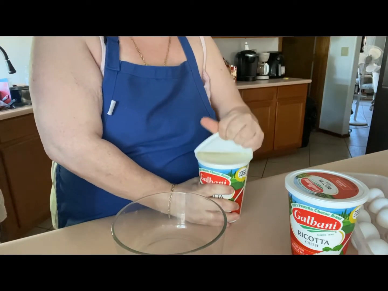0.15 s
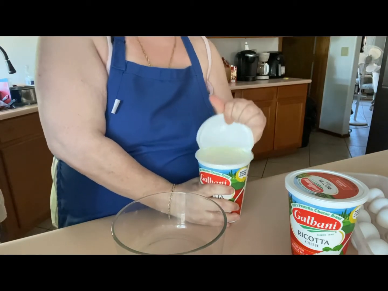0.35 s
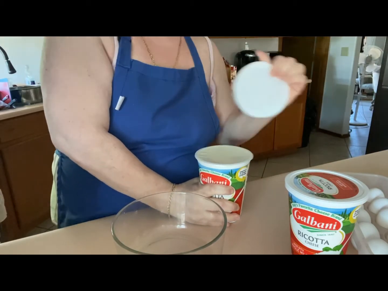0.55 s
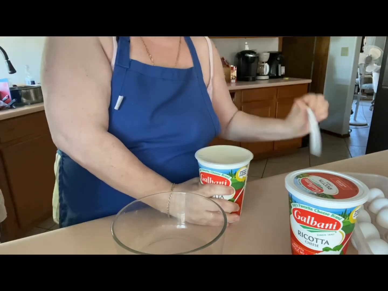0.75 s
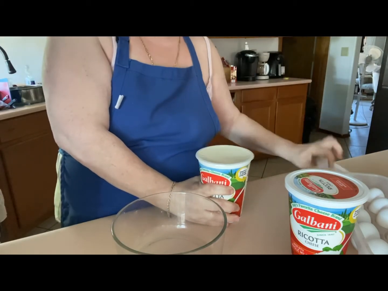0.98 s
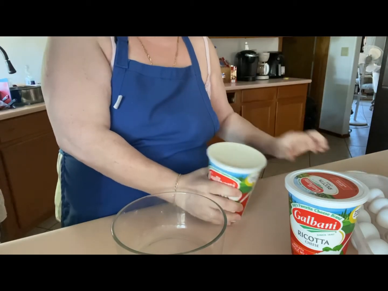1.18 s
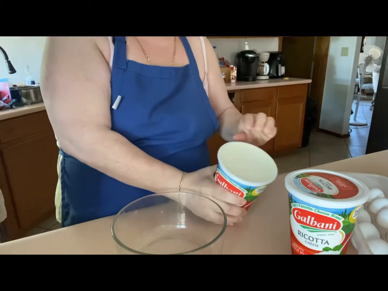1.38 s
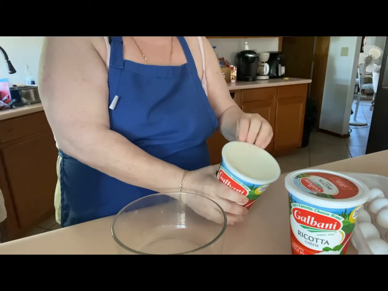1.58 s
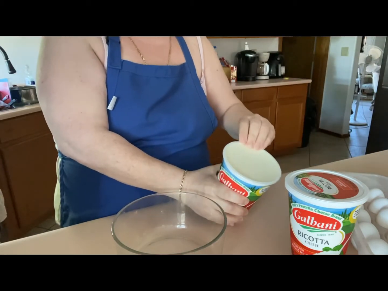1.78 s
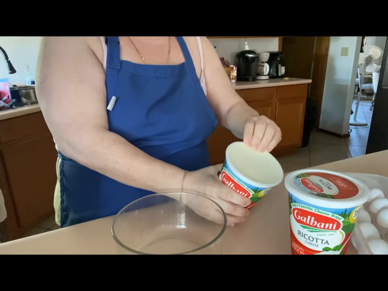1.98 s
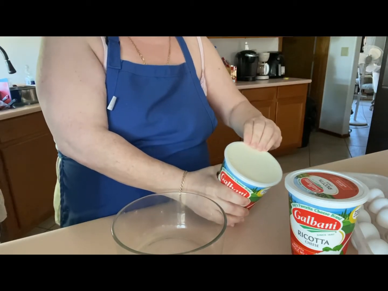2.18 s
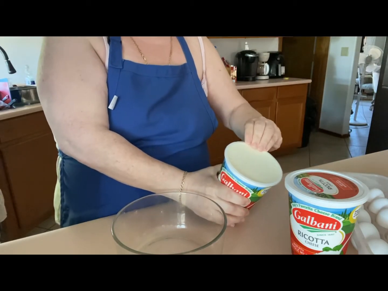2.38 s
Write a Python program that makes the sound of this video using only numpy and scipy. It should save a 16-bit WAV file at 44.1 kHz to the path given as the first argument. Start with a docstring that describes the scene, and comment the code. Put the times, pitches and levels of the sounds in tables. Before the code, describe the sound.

A plastic lid snaps off a tub, then clatters onto a kitchen counter.

```python
"""Kitchen counter: a hand pries the lid off a plastic tub. The stressed rim creaks and lets go in
sharp snaps, the tub pops, the counter thuds. The tossed lid slaps down, bounces with a clack and
wobbles to rest; fingers brush the foil seal. Hard walls ring after each hit, over appliance rumble
and a thin whine."""
import sys
import numpy as np
from scipy import signal
from scipy.fft import rfft, irfft
from scipy.io import wavfile
from scipy.ndimage import uniform_filter1d

SR = 44100
rng = np.random.default_rng(int(sys.argv[2]) if len(sys.argv) > 2 else 0)


def bounce(signal):
    """Save signal as a 16-bit WAV file at the path given by the first command-line argument."""
    frames = np.transpose(np.atleast_2d(signal))
    limited = np.clip(frames, -1, 1)
    pcm = np.round(limited * 32767).astype(np.int16)
    wavfile.write(sys.argv[1], SR, pcm)


N = 108045
T = np.arange(N) / SR

# appliance noise spectrum: f/Hz, relative density/dB
HUM_SPECTRUM = [(25, -17.5), (50, -2), (90, -9.5), (120, -2), (170, -11.5), (210, -5), (300, -2),
                (394, -10.5), (531, -10.5), (800, -22), (1370, -34.5), (3000, -41.5), (6200, -45.5),
                (11200, -48), (12500, -62), (16000, -64.5)]
# its stereo width: f/Hz, side minus mid/dB
HUM_WIDTH = [(60, -22), (110, -16), (200, -12), (380, -4), (700, 1), (1290, 1.5), (2380, 0.5), (4400, 1.5),
             (8120, -9.5), (15000, 8.5)]
# its balance: f/Hz, left minus right/dB
HUM_BALANCE = [(60, 3), (110, 0), (200, 2.5), (380, 5.5), (700, 3), (1290, 0.5), (2380, 2.5), (4400, 3),
               (8120, 0.0), (15000, 1)]
# swell of its bass: t/s, gain/dB
BASS_SWELL = [(0, -1.5), (.7, 0.5), (1.3, -0.5), (1.7, -3), (1.95, 1.5), (2.45, -0.5)]
# appliance whine: f/Hz, rms level/dB
WHINE_TONES = [(3031, -87.5)]
# kitchen reverberation: f/Hz, t60/s, relative level/dB
ROOM_BANDS = [(125, 0.47, -4), (252, .55, 2.5), (514, .65, 5.5), (930, .65, 1.5), (2160, .65, 4.5),
              (3209, 0.33, 0), (5500, 0.26, -7.5), (8100, 0.34, -3), (10297, 0.23, -4)]
# microphone port balance: f/Hz, left minus right/dB
PORT_BALANCE = [(60, 1.5), (110, 0), (200, 5), (380, 2.5), (700, 4), (1290, 2.0), (2380, 3.5), (4400, 1.5),
                (8120, -0.5), (15000, -1.5)]
# microphone port phase: f/Hz, left lead/rad
PORT_PHASE = [(100, 0), (500, -.5), (1000, -.25), (2000, -.5), (4000, -.4), (8000, -1.3), (12000, -2.55),
              (16000, -2.6)]
# fingers on the seal: t/s, length/s, level/dB
BRUSHES = [(0.628, .04, -84), (0.733, 0.06, -83.5), (1.426, .045, -72), (1.447, 0.098, -70.5),
           (1.93, 0.069, -78.5), (2.069, 0.052, -99)]
# counter top modes: f/Hz, relative level/dB, t60/s
COUNTER_MODES = [(52.67, -7.5, 0.44), (65, -5, 0.34), (98, -6.5, 0.32), (119, -2, 0.28), (135, -10, .3),
                 (142, -7.5, 0.084), (182.5, -12, 0.25), (222, -10.5, .1), (281, -10.5, 0.072),
                 (331, -16.5, 0.24)]
# pushes on the counter: t/s, peak/dB
THUDS = [(.0, -44.5), (.12, -43), (.254, -15.5), (0.299, -35.5), (.44, -48.5), (.81, -48), (0.899, -44.5),
         (1.085, -52)]
# short hollow plastic knocks (tub pops, then the bouncing lid's clack): t/s, peak/dB, f/Hz
KNOCKS = [(.125, -40, 1640), (.2413, -22, 1400), (.2503, -10.5, 1600), (.2525, -16, 3930),
          (0.3005, -12.5, 1513), (.3, -19, 678), (.33, -26, 316), (0.9744, -19.5, 1390),
          (.9755, -35.5, 2000)]
# free lid modes: f/Hz, relative level/dB, t60/s
LID_MODES = [(900, -18, .006), (1204, -2, .008), (1650, -5, 0.019), (1940, -6.5, 0.022), (2065, -8, 0.034),
             (2450, -3, 0.0058), (3197, -6.5, .014), (4150, -4.5, 0.0069), (5072, -3.5, 0.0028),
             (5770, -4, 0.0027), (6610, -6, 0.0037), (7500, -7, .0025), (8800, -10.5, .002),
             (12200, -12.5, .0015)]
# modes of the lid landing flat: f/Hz, relative level/dB, t60/s
SLAP_MODES = [(162, -14, 0.085), (361.1, -6.5, 0.071), (620, -12, 0.027), (888, -2.5, 0.013),
              (1142, -1.5, 0.0086), (1490, -3.5, .008), (1950, -6.5, 0.0057), (2500, -11, 0.0037),
              (3310, -27.5, 0.0022)]
# flat landing: t/s, peak/dB
SLAP = (.8097, -9)
# lid edge ticking the counter: t/s, peak/dB, nominal length/ms, tilt/(dB/octave)
BOUNCES = [(0.907, -17.5, 1.6, 3), (0.969, -33, 1.5, 3.5), (0.9741, -21.5, 0.57, -0.5),
           (1.008, -37.5, 1.4, 11.5), (1.114, -29, 0.34, -1), (1.122, -32, 0.5, 2.5), (1.147, -48, 1.2, 4),
           (1.157, -35, 0.65, -2), (1.186, -60, 1.2, -9)]
# lid rolling on its edge: t/s, level/dB
WOBBLE_ENVELOPE = [(.90, -72), (.915, -40.5), (1.0, -41), (1.1, -57), (1.13, -49.5), (1.19, -51.5),
                   (1.24, -54.5), (1.3, -85.5)]
# rim resonances: f/Hz, width/Hz, relative level/dB
RIM_MODES = [(308.4, 200, -7), (680.1, 250, -3), (1035, 400, -3.5), (1656, 730, 1.5), (2592, 510, -2),
             (3755, 1400, -2), (6235, 1500, -1), (7980, 2200, -1.5), (10800, 6100, -7.5),
             (14577, 3500, -11)]
# creak of the stressed rim: t/s, level/dB
CREAK_ENVELOPE = [(0, -48.5), (.05, -55), (.1, -55.5), (.14, -54.5), (.2, -63), (.238, -57), (.258, -33),
                  (.28, -43.5), (.3, -37.5), (.31, -51.5), (.33, -88)]
# rim letting go: t/s, peak/dB, nominal length/ms, tilt/(dB/octave)
SNAPS = [(.001, -41, 0.88, -3), (0.013, -42.5, 0.45, 1.5), (0.044, -43, 0.65, -1.5),
         (0.06, -43.5, 0.4, -5.5), (0.112, -42.5, 1.5, 2.5), (0.115, -43.5, 0.34, -3.5),
         (0.123, -36, 1.6, -4), (0.128, -39.5, 1.3, 5), (0.13, -43, .6, 6), (.149, -40, 1.1, 6.5),
         (.232, -47.5, 0.83, 3), (0.2423, -30.5, 0.89, -3), (0.2495, -3, 0.4, 4), (.2522, -2, .6, 1),
         (.2553, -8.5, 0.35, 1), (0.283, -18.5, 1, 5), (.2885, -12.5, 1, 8.5), (.298, -9.5, 0.9, 1)]


def amp(db):
    return 10 ** (np.asarray(db) / 20)


def unit_rms(x):
    return x / np.sqrt(np.mean(x ** 2))


def over_bins(table):
    """(f/Hz, value) table at the FFT bins, on a log axis."""
    hz, values = np.array(table).T
    return np.interp(np.log(np.arange(N // 2 + 1) * SR / N + 1), np.log(hz), values)


def envelope(table):
    """(t/s, level/dB) table as gain; silent past its end."""
    return amp(np.interp(T, *np.array(table).T, right=-150))


def pan(x, left_gain):
    """Per-bin gain on the left, its inverse on the right."""
    return irfft(rfft(x) * np.array([left_gain, 1 / left_gain]), N)


def band(x, hz, width_hz):
    """Two-pole resonance, unity gain at centre."""
    return signal.lfilter(*signal.iirpeak(hz, hz / width_hz, fs=SR), x)


def ring(modes, tilt_db_oct=0):
    """Impulse response of decaying modes, signs alternating, tilted about 2 kHz."""
    t = T[:SR // 2]
    out = np.zeros(len(t))
    for k, (hz, db, t60_s) in enumerate(modes):
        gain = (-1) ** k * amp(db + tilt_db_oct * np.log2(hz / 2000))
        out += gain * np.sin(2 * np.pi * hz * t) * 1000 ** (-t / t60_s)
    return out


def add(out, start_s, x, peak_db):
    i = int(start_s * SR)
    x = x[:N - i]
    out[i:i + len(x)] += x * amp(peak_db) / np.max(np.abs(x))


def push(ms):
    """Smooth contact force pulse."""
    return np.hanning(int(ms * SR / 1000) + 3)


def burst(ms):
    """Scratchy force: noise that swells and dies within a few ms."""
    tau_s = ms * 0.0015 + 5e-5
    age = T[:2000] / tau_s
    return rng.standard_normal(2000) * np.sqrt(age) * np.exp(-age)


def clicks(per_s, scatter_db):
    """Random impulses of uneven size."""
    chance, polarity, size = rng.random((3, N))
    return (chance < per_s / SR) * np.sign(polarity - .5) * amp(-scatter_db * np.log(size + 0.0012))


def wander(per_s):
    """Random steps, smoothed twice; unit spread."""
    hold = int(SR / per_s)
    steps = np.repeat(rng.standard_normal(N // hold + 1), hold)
    smooth = uniform_filter1d(uniform_filter1d(steps, hold), hold)[:N]
    return smooth / np.std(smooth)


def appliance_rumble(mid_db=-60, swell_top_hz=400, wander_db=1.2):
    """Shaped stereo noise: bass swells slowly under a steady hiss."""
    shape = amp(over_bins(HUM_SPECTRUM))
    mid = irfft(rfft(rng.standard_normal(N)) * shape, N)
    side = irfft(rfft(rng.standard_normal(N)) * shape * amp(over_bins(HUM_WIDTH)), N)
    hum = pan(np.array([mid + side, mid - side]), amp(over_bins(HUM_BALANCE) / 2))
    hum *= amp(mid_db) / np.std(mid)
    bass = signal.sosfiltfilt(signal.butter(1, swell_top_hz, fs=SR, output="sos"), hum)
    swell = amp(wander_db * wander(per_s=3.8)) * envelope(BASS_SWELL)
    return hum - bass + bass * swell


def appliance_whine(flutter_db=2.2):
    """Thin tone of wavering level."""
    return sum(amp(db + flutter_db * wander(per_s=20)) * np.sqrt(2) * np.sin(2 * np.pi * hz * T)
               for hz, db in WHINE_TONES)


def kitchen_reverb(x, gain_db=-10.5, onset_ms=4.4, correlation=0.5, early_t60_s=0.088, top_hz=11200):
    """Diffuse tail off hard walls, one decay per band; channels partly alike."""
    t = T[:SR]
    noise = rng.standard_normal((3, SR))
    noise = np.sqrt(correlation) * noise[0] + np.sqrt(1 - correlation) * noise[1:]
    tail = sum(amp(db) * band(noise, hz, .7 * hz) * 1000 ** (-t / t60_s) for hz, t60_s, db in ROOM_BANDS)
    tail *= np.clip(t * 1000 / onset_ms, 0, 1) ** 2
    tail *= 1 + 1000 ** (-t / early_t60_s)  # near surfaces answer first
    tail = signal.sosfilt(signal.butter(12, top_hz, fs=SR, output="sos"), tail)
    tail *= amp(gain_db) / np.sqrt(np.sum(tail ** 2) / 2)
    return signal.fftconvolve(x[None], tail, axes=1)[:, :N]


def mic_ports(x):
    """Two ports hear a near source with their own balance and phase."""
    return pan(x, amp(over_bins(PORT_BALANCE) / 2) * np.exp(.5j * over_bins(PORT_PHASE)))


def fingers(centre_hz=8000, width_hz=4000, flicker_db=1.5):
    """Faint high hiss of skin on foil."""
    strokes = sum(amp(db) * np.sin(np.pi * np.clip((T - start_s) / length_s, 0, 1))
                  for start_s, length_s, db in BRUSHES)
    flicker = amp(flicker_db * wander(per_s=81.15))
    hiss = band(rng.standard_normal(N), centre_hz, width_hz)
    return strokes * flicker * unit_rms(band(hiss, centre_hz, width_hz))


def counter_thuds():
    """Soft pushes ring the counter top."""
    out = np.zeros(N)
    thud = np.convolve(push(ms=2.7), ring(COUNTER_MODES))
    for start_s, db in THUDS:
        add(out, start_s, thud, db)
    return out


def plastic_knocks(t60_s=0.0066, rise_ms=0.62):
    """One damped mode each: the tub pops as the lid comes off, then the lid clacks as it bounces."""
    out = np.zeros(N)
    rise = np.minimum(T[:SR // 2] * 1000 / rise_ms, 1)
    for start_s, db, hz in KNOCKS:
        add(out, start_s, ring([(hz, 0, t60_s)]) * rise, db)
    return out


def lid(force, tilt_db_oct=0, low_hz=690):
    """The thin lid rings, with no bass."""
    ringing = signal.fftconvolve(force, ring(LID_MODES, tilt_db_oct))
    return signal.sosfilt(signal.butter(2, low_hz, "high", fs=SR, output="sos"), ringing)


def tossed_lid():
    """One flat slap with a crack, then edge ticks over a rolling rattle."""
    rattle = lid(clicks(per_s=1700, scatter_db=0.98))[:N]
    out = unit_rms(rattle) * envelope(WOBBLE_ENVELOPE)
    slap_s, slap_db = SLAP
    slap = np.convolve(np.diff(push(ms=0.52)), ring(SLAP_MODES))
    add(out, slap_s, slap, slap_db)
    crack = band(burst(ms=0.53), hz=4200, width_hz=7400)
    add(out, slap_s, crack, peak_db=-22.5)
    for start_s, db, ms, tilt_db_oct in BOUNCES:
        add(out, start_s, lid(burst(ms), tilt_db_oct), db)
    return out


def rim(force, tilt_db_oct):
    """Broad resonances of the plastic rim, tilted about 4 kHz."""
    return sum((-1) ** k * amp(db + tilt_db_oct * np.log2(hz / 4000)) * band(force, hz, width_hz)
               for k, (hz, width_hz, db) in enumerate(RIM_MODES))


def rim_release():
    """The stressed rim snaps free over a creak of tiny slips."""
    slips = clicks(per_s=1600, scatter_db=1.5)
    out = unit_rms(rim(slips, tilt_db_oct=-4)) * envelope(CREAK_ENVELOPE)
    for start_s, db, ms, tilt_db_oct in SNAPS:
        add(out, start_s, rim(burst(ms), tilt_db_oct), db)
    return out


def scene():
    near = rim_release() + plastic_knocks() + tossed_lid() + fingers()
    foreground = mic_ports(near + kitchen_reverb(near) + counter_thuds())
    return foreground + appliance_rumble() + appliance_whine()


def record(dry):
    """The microphone loses the deepest bass; the recorder cuts the top."""
    low_hz, top_hz = 42.5, 16300
    dry = signal.sosfilt(signal.butter(4, low_hz, "high", fs=SR, output="sos"), dry)
    return signal.sosfilt(signal.ellip(8, .2, 70, top_hz, fs=SR, output="sos"), dry)


dry = scene()
out = record(dry)
bounce(out)
```